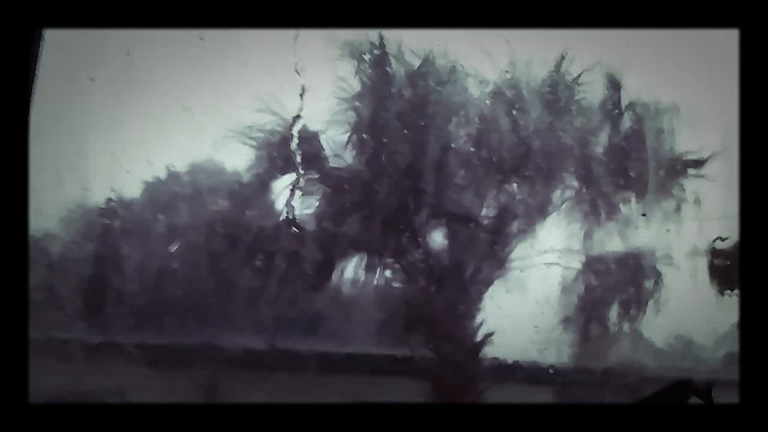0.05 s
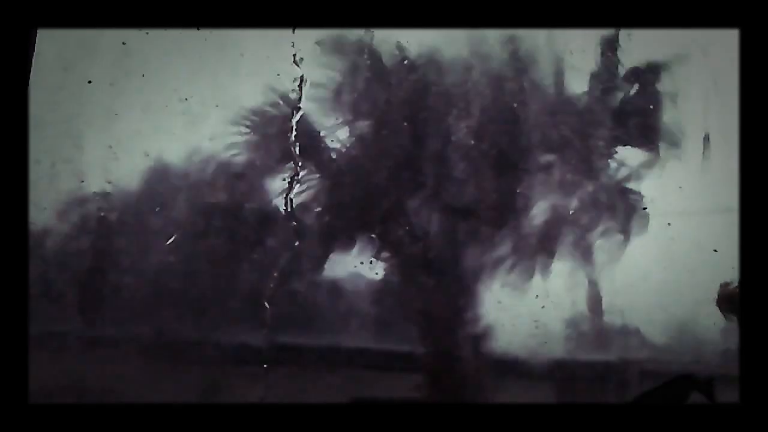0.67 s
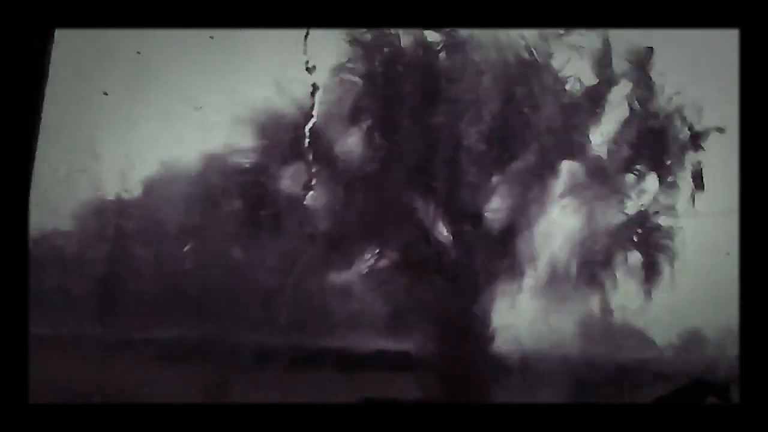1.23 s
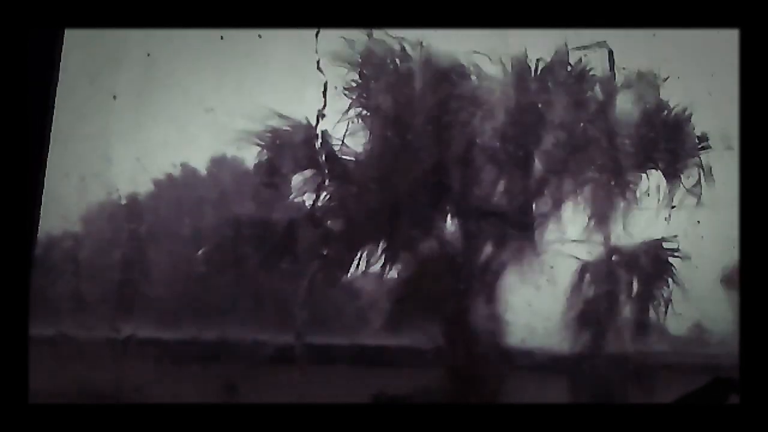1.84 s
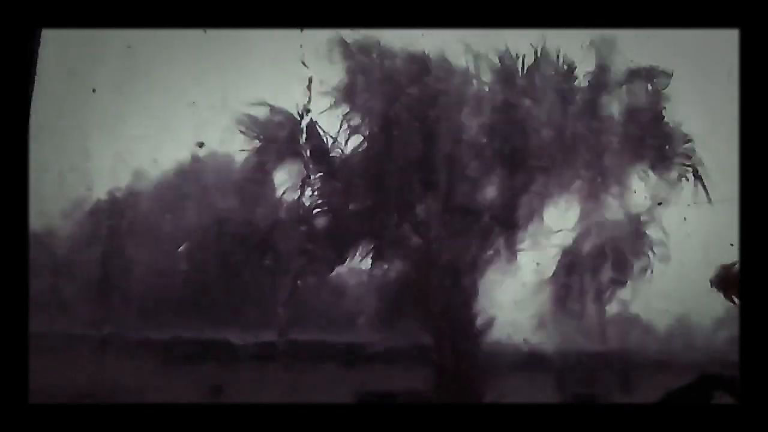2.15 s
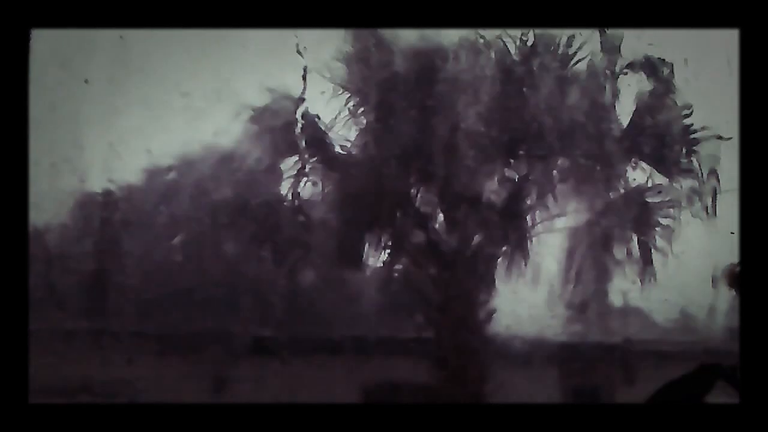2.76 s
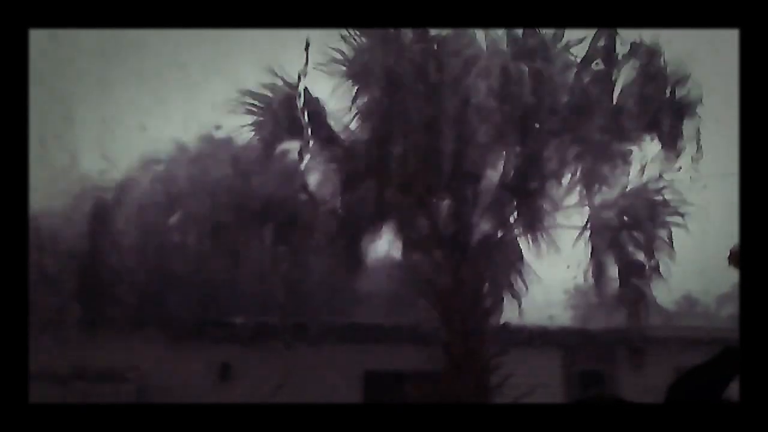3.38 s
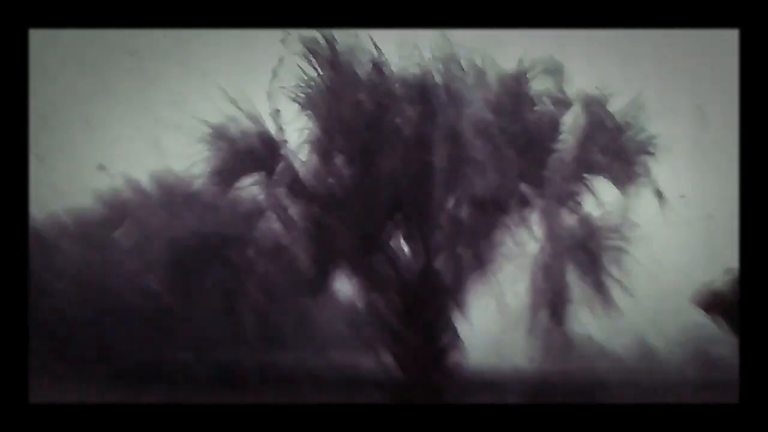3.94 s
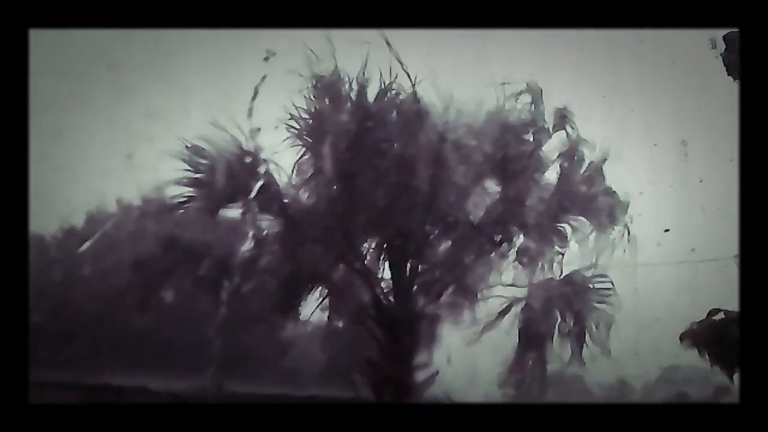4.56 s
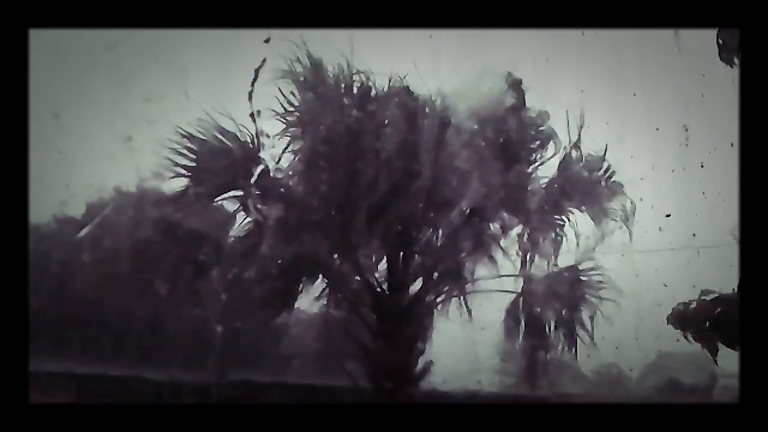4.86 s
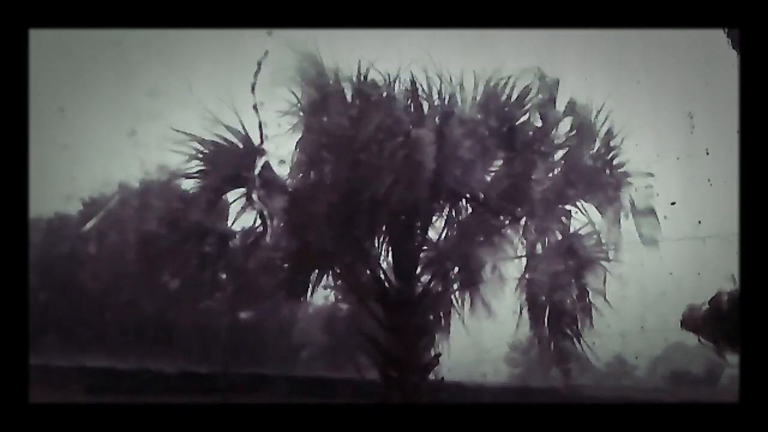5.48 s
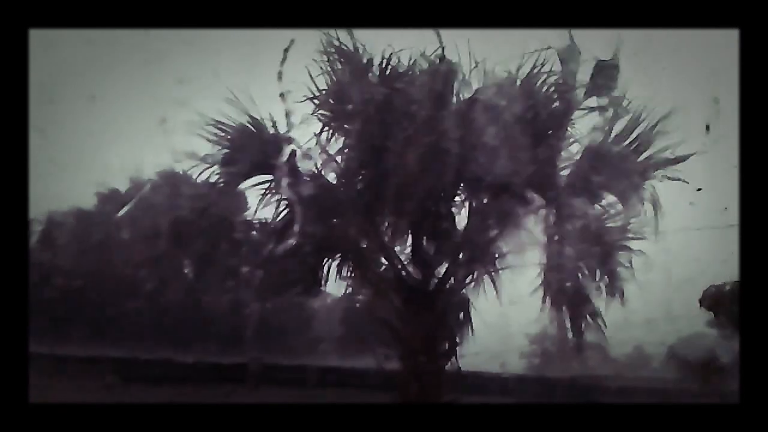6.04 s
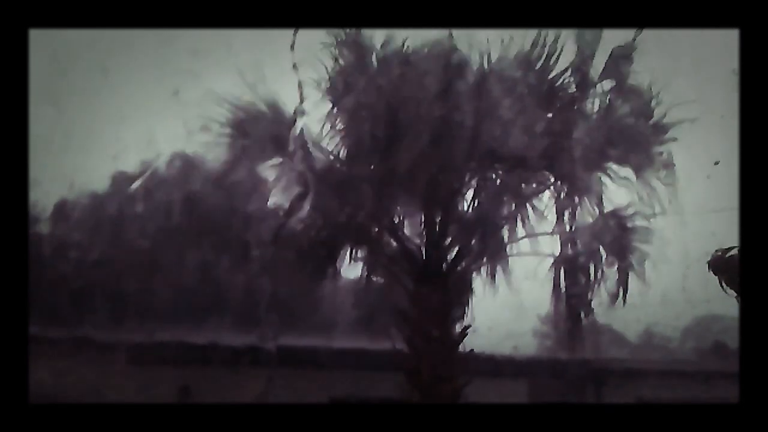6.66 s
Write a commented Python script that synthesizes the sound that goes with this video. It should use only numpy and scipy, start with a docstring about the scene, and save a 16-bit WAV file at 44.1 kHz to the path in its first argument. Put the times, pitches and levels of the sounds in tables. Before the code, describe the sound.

A rainstorm roars outside as spray patters on a window, gusts thud against the pane and something thumps the wall.

```python
"""A rainstorm heard from a room, behind a window. The sound starts abruptly: countless drop impacts
add up to a roar in the trees, spray patters on the glass and wind makes the pane rumble. Splashes
crackle; from about 2 s gusts drive the pane's resonances, and the strongest flings water at it.
Just after 4 s something knocks on the wall, debris rattles on the glass and a hard drop ticks; then the
rain eases. Two spaced microphones, one wired in opposite polarity, receive it all."""
import sys
import numpy as np
from scipy import signal
from scipy.fft import rfft, irfft, next_fast_len
from scipy.io import wavfile
from scipy.ndimage import uniform_filter1d, map_coordinates

SR = 44100
rng = np.random.default_rng(int(sys.argv[2]) if len(sys.argv) > 2 else 0)


def wav_out(sig):
    """Save sig, one row per channel (or a flat mono array), as 16-bit PCM at SR to the path in sys.argv[1]."""
    wavfile.write(sys.argv[1], SR, np.round(np.clip(np.atleast_2d(sig).T, -1, 1) * 32767).astype(np.int16))


N = 295911

# strength of the downpour: time_s, relative_level_db
DOWNPOUR = [(0.6, -52.5), (0.85, -52.5), (1.12, -53), (1.22, -54.5), (1.33, -52.5), (1.55, -54.5),
            (2.3, -53), (3.0, -55), (3.55, -56.5), (3.8, -53.5), (4.06, -52.5), (4.4, -55), (6.7, -55.5)]
TOP_HZ = 14300  # upper band limit


def amp(db):
    """Decibels to amplitude ratio."""
    return 10 ** (np.asarray(db) / 20)


def unit(x):
    """Normalisation to rms 1."""
    return x / np.sqrt(np.mean(x ** 2) + 1e-20)


def along(points, hz):
    """Interpolation of (frequency_hz, value) points on a logarithmic frequency axis."""
    knots_hz, values = np.transpose(points)
    return np.interp(np.log(hz + 1), np.log(knots_hz + 1), values)


def over_time(points):
    """Linear interpolation of (time_s, value) points at every sample."""
    return np.interp(np.arange(N) / SR, *np.transpose(points))


def wobble(rate):
    """Slow random modulation: a spline through rate knots a second."""
    return map_coordinates(rng.standard_normal(int(N * rate / SR) + 4), [np.arange(N) * rate / SR])


def filtered(x, response):
    """Linear filtering: the spectrum of x times a frequency response."""
    n = x.shape[-1]
    padded = next_fast_len(n + 8192)
    return irfft(rfft(x, padded) * response(np.fft.rfftfreq(padded, 1 / SR)), padded)[..., :n]


def patchy_noise(patchy_db):
    """Two independent noises, modulated by the same random patches in time and frequency."""
    spectra = signal.stft(rng.standard_normal((2, N)), nperseg=512)[2]
    patches = uniform_filter1d(rng.standard_normal(spectra.shape[1:]), size=7, axis=0)
    patches = uniform_filter1d(patches, size=12, axis=1)
    return signal.istft(spectra * amp(patchy_db * unit(patches)), nperseg=512)[1][:, :N]


def diffuse(pair, spectrum, spacing_m=0.15, sound_speed_m_s=343):
    """Diffuse-field coherence: long waves reach both microphones alike, short ones do not."""
    def response(hz):
        turn = np.arccos(np.sinc(2 * hz * spacing_m / sound_speed_m_s)) / 2
        return amp(along(spectrum, hz)) * [np.cos(turn), np.sin(turn)]
    common, apart = filtered(pair, response)
    return unit(np.array([common + apart, common - apart]))


def from_side(x, lead_s):
    """Path difference: the sound reaches the right microphone lead_s before the left."""
    return filtered(x, lambda hz: np.exp(1j * np.pi * hz * lead_s * np.array([[-1], [1]])))


def surge(t, hold_s, attack_s, release_s):
    """An envelope with a linear rise and, after hold_s, an exponential decay."""
    return np.clip(t / attack_s, 0, 1) * np.exp(-np.maximum(t - hold_s, 0) / release_s)


def surges(rows, attack_s, release_s):
    """Incoherent addition: the summed power of (start_s, level_db, hold_s) events."""
    t = np.arange(N) / SR
    return sum((amp(db) * surge(t - s, hold, attack_s, release_s)) ** 2 for s, db, hold in rows)


def roar():
    """Superposition: countless drops on leaves, roof and ground merge into a wash of noise."""
    # spectrum of the rain: frequency_hz, density_db
    rain_spectrum = [(30, -18), (90, 4.5), (200, 8.5), (295, 7), (370, 2.5), (450, 3), (560, 1.3),
                     (760, 1.3), (950, 0.5), (1300, -2.5), (1750, -2.5), (2300, -4), (2800, -4.5),
                     (3300, -6.5), (4000, -8), (6500, -14.5), (14000, -19)]
    wash = diffuse(patchy_noise(patchy_db=1.4), rain_spectrum)
    direct = filtered(rng.standard_normal(N), lambda hz: amp(along(rain_spectrum, hz)))
    direct = unit(from_side(direct, lead_s=0.00029))
    level_db = over_time(DOWNPOUR) + 6.5 + 0.24 * wobble(15)
    return amp(level_db) * unit(wash + amp(-6.5) * direct)


def drops(rate, spread_db):
    """Shot noise: impulses at random times and directions, most small, a few large."""
    when, strength, direction = rng.random((int(rate * N / SR), 3)).T
    at = (when * (N - 1)).astype(int)
    size = amp(spread_db * np.minimum(-np.log(1 - strength), 3.6))
    turn = direction * np.pi / 2
    return unit(np.array([np.bincount(at, size * side, N) for side in (np.cos(turn), np.sin(turn))]))


def spray(splat_t60_s=0.042):
    """Impact noise: fine spray hisses on the glass, bigger drops splat, and sheets of rain swell both."""
    # sheets of rain sweeping the glass: start_s, level_db, hold_s
    sheets = [(.67, -52.5, 0.17), (3.755, -49, 0.09), (4.12, -50, 0.025)]
    # spectrum of the spray: frequency_hz, density_db
    spray_spectrum = [(800, 0), (2500, -11), (4500, -3.5), (7000, -4), (9500, -2), (12000, -1.5),
                      (14300, -10)]
    rain_db = over_time(DOWNPOUR)
    steady_db = -54 + 0.82 * (rain_db - rain_db.mean())
    level_db = 10 * np.log10(amp(steady_db) ** 2 + surges(sheets, attack_s=0.0088, release_s=0.12))
    hiss = diffuse(patchy_noise(patchy_db=2.1), spray_spectrum)
    t = np.arange(SR // 50) / SR
    decay = amp(-60 * t / splat_t60_s)[None]
    splat_power = signal.fftconvolve(drops(rate=360, spread_db=16) ** 2, decay ** 2, axes=1)[:, :N]
    patter = diffuse(np.sqrt(np.abs(splat_power)) * rng.standard_normal((2, N)), spray_spectrum)
    return amp(level_db + 0.27 * wobble(8.7)) * (amp(-2) * hiss + amp(-10.5) * patter)


def wind_pressure(steady_db=-47.5, eddy_db=0.5, eddy_decay_s=0.27):
    """Turbulence: steady wind, gusts and the dying eddies they leave add in power to a level in dB."""
    # gusts pressing on the pane: start_s, level_db, hold_s
    gusts = [(1.9, -39, 0.066), (2.07, -42.5, 0.14), (2.35, -40, 0.079), (3.22, -43.5, 0.12),
             (3.615, -37.5, 0.16), (3.875, -53, 0.026), (4.28, -38.5, 0.082), (4.49, -42.5, 0.05),
             (5.04, -43.5, 0.17), (5.53, -49, 0.06)]
    gust_power = surges(gusts, attack_s=0.014, release_s=0.032)
    fade = np.exp(-1 / (eddy_decay_s * SR))
    eddy_power = amp(eddy_db) ** 2 * signal.lfilter([1 - fade], [1, -fade], gust_power)
    return 10 * np.log10(amp(steady_db) ** 2 + gust_power + eddy_power)


def resonances(modes):
    """Modal superposition: the response of damped resonators of alternating sign."""
    return lambda f: sum((-1) ** k * amp(db) * 1j * f * width / (pitch ** 2 - f ** 2 + 1j * f * width)
                         for k, (pitch, width, db) in enumerate(modes))


def evened(pane):
    """Division by the running rms steadies the pane's swing, so that it follows the pressure closely."""
    return pane / np.sqrt(np.abs(uniform_filter1d(pane[0] ** 2, size=2600)) + 0.031)


def wind():
    """Forced vibration: wind makes the pane rumble; the harder it blows, the more the modes drum."""
    # spectrum of the rumbling pane: frequency_hz, density_db
    rumble_spectrum = [(15, -30), (30, -17), (48, -2), (75, -0.5), (102, 3), (135, 0.5), (178, -3),
                       (225, -7), (320, -19), (600, -32), (1500, -55)]
    # spectrum of the force on its modes: frequency_hz, density_db
    drive_spectrum = [(30, -19), (80, -8), (300, -8), (900, -33)]
    # modes of the pane: pitch_hz, bandwidth_hz, level_db
    pane_modes = [(105, 28, -6.5), (124, 13, -10.5), (155, 15, 0), (180.3, 18.5, 1.5), (224, 9, -6.5),
                  (285.5, 12, -14.5)]
    level_db = wind_pressure()
    rumble = diffuse(rng.standard_normal((2, N)), rumble_spectrum)
    drive = diffuse(rng.standard_normal((2, N)), drive_spectrum)
    drumming = unit(filtered(drive, resonances(pane_modes)))
    drumming = from_side(drumming, lead_s=-0.00012)  # a little to the left
    modal_share = 0.57 / (1 + np.exp(-(level_db + 40) / 3))
    pane = np.sqrt(1 - modal_share) * rumble + np.sqrt(modal_share) * drumming
    return amp(level_db) * evened(pane) * amp([[0.5], [-0.5]])


def burst(centre_hz, width_octaves, length_s, attack_s=0.00072):
    """A band-limited transient: uneven fizz with separate impulses crackling in it."""
    def colour(hz):
        return np.exp(-0.5 * (np.log2((hz + 1) / centre_hz) / width_octaves) ** 2) * (hz < TOP_HZ)
    t = np.arange(SR // 3) / SR
    uneven = amp(unit(uniform_filter1d(rng.standard_normal(len(t)), size=90)))
    fizz = filtered(uneven * rng.standard_normal((2, len(t))), colour)
    crackle = filtered(drops(rate=420, spread_db=5)[:, :len(t)], lambda hz: np.sqrt(colour(hz)))
    envelope = (1 - np.exp(-t / attack_s)) * np.exp(-(t / length_s) ** 2)
    return envelope * unit(fizz + amp(-11) * crackle)


def splashes():
    """Liquid impact: flung water strikes the glass in bursts of droplets, each in its own band."""
    # water hitting the glass: start_s, level_db, centre_hz, width_octaves, length_s
    impacts = [(0.773, -49, 9000, 1, 0.02), (1.159, -50, 10000, 0.37, 0.0064),
               (1.354, -55, 5000, 0.94, 0.039), (1.672, -47, 8000, 0.97, 0.0036),
               (2.734, -54, 10000, .6, 0.014), (3.76, -44, 12000, .3, .002), (3.768, -47, 12000, 0.5, .008),
               (3.779, -46, 12000, .4, .004), (3.78, -46.5, 8500, .7, 0.006),
               (3.834, -44, 12000, 0.35, 0.005), (3.845, -50, 10500, .6, 0.011),
               (3.8995, -45, 9500, .6, 0.005), (4.04, -47, 2010, 1, 0.026), (4.54, -52, 9000, .75, 0.013),
               (4.987, -50.5, 9200, 0.46, 0.01)]
    out = np.zeros((2, N + SR))
    for start_s, db, centre_hz, width_octaves, length_s in impacts:
        splash = amp(db) * burst(centre_hz, width_octaves, length_s)
        out[:, round(start_s * SR):][:, :splash.shape[1]] += splash
    return out[:, :N]


def buffets():
    """Plate flexure: sudden shoves of air bend the whole pane with a deep thud, each at its own pitch."""
    # shoves of air: start_s, level_db, hold_s, pitch_ratio
    shoves = [(1.945, -44, 0.03, .7), (2.111, -42, 0.026, 0.74), (2.197, -45, 0.045, 0.72),
              (2.387, -44, 0.04, .7), (3.31, -50, .04, 0.69), (3.651, -33.5, 0.1, 0.95),
              (3.883, -39.5, .045, 1), (4.29, -35.5, 0.064, 1.05), (4.502, -39, .03, 0.71),
              (5.139, -41, 0.034, 1.17), (5.25, -42, 0.032, 1), (5.383, -39, 0.02, 0.85),
              (5.554, -43, .025, .9), (5.79, -45, .025, 0.96), (6.232, -40, 0.036, 1.12)]
    # spectrum of the flexing pane at pitch ratio 1: frequency_hz, density_db
    flex_spectrum = [(18, -24), (35, -17), (60, -2), (95, 6), (140, -25), (300, -36), (900, -70)]
    out, t = np.zeros((2, N + SR)), np.arange(SR // 3) / SR
    for start_s, db, hold_s, pitch_ratio in shoves:
        shifted = np.array(flex_spectrum) * [pitch_ratio, 1]
        swing = evened(diffuse(rng.standard_normal((2, len(t))), shifted))
        push = amp(db) * surge(t, hold_s, attack_s=0.012, release_s=0.018)
        out[:, round(start_s * SR):][:, :len(t)] += push * swing
    return out[:, :N] * amp([[0.5], [-0.5]])


def knock():
    """Impact excitation: a blunt object thumps the wall and bounces, ringing its damped modes."""
    # the blow and its bounces: start_s, level_db
    blows = [(4.0405, -24.5), (4.0473, -35), (4.0622, -58), (4.0897, -45)]
    # modes of the wall: pitch_hz, level_db, t60_s
    wall_modes = [(136.2, -13, 0.064), (192, 2.5, 0.071), (273, 2.5, 0.061), (324, -2, 0.069),
                  (440, 2.5, 0.036), (495, 0.5, 0.039), (630, -13, 0.031), (850, -12, 0.07)]
    thump, t = np.zeros(N + SR), np.arange(SR // 2) / SR
    ring = sum(amp(db - 60 * t / t60) * np.sin(2 * np.pi * hz * t) for hz, db, t60 in wall_modes)
    for start_s, db in blows:
        thump[round(start_s * SR):][:len(t)] -= amp(db) * ring * (1 - np.exp(-t / 0.00022))
    # the contact is soft, and the wall radiates little deep bass
    thump = signal.sosfilt(signal.butter(2, [95, 920], "bandpass", fs=SR, output="sos"), thump)[:N]
    direct = np.array([np.roll(thump, 4), thump])  # reaches the right microphone first
    return (direct + amp(-11.5) * ring_out(thump, t60_s=0.24)) * amp([[0.7], [-0.7]])


def ring_out(x, t60_s):
    """Reverberation: the room's dying tail of reflections, partly alike at the two microphones."""
    t = np.arange(SR // 2) / SR
    tail = rng.standard_normal((2, len(t))) * amp(-60 * t / t60_s)
    common, apart = signal.fftconvolve(x[None], tail / np.linalg.norm(tail[0]), axes=1)[:, :N]
    return np.array([common + 0.31 * apart, common - 0.29 * apart])


def clicks(hits, modes, attack_s, dispersion_s=0, scatter_db=0.8, detune=0.02):
    """Free vibration: each hard contact rings the modes at a slightly different strength and pitch."""
    out = np.zeros((2, N + SR))
    hz, mode_db, t60 = np.transpose(modes)[:, :, None]
    delay_s = dispersion_s * (np.sqrt(hz.max() / hz) - 1)
    t = np.maximum(np.arange(SR // 20) / SR - delay_s, 0)
    for start_s, db in hits:
        louder, higher, phase = rng.standard_normal((3, 2, len(modes), 1))
        envelope = amp(db + mode_db + scatter_db * louder - 60 * t / t60) * (1 - np.exp(-t / attack_s))
        ring = envelope * np.sin(2 * np.pi * (hz * (1 + detune * higher) * t + phase))
        out[:, round(start_s * SR):][:, :t.shape[1]] += ring.sum(axis=1)
    return out[:, :N]


def debris():
    """Impact and friction: light debris grazes the window, a brief, hard rattle over a dry scrape."""
    # contacts of the rattle: start_s, level_db
    taps = [(4.1502, -32.5), (4.1520, -35.5), (4.1530, -38), (4.1545, -33.5), (4.1558, -42),
            (4.1578, -35.5)]
    # modes the debris rings with: pitch_hz, level_db, t60_s
    tap_modes = [(2860, -14, 0.0068), (3480, 2.5, 0.007), (4600, -5.5, 0.006), (5900, -0.5, 0.0046),
                 (7650, -0.5, 0.007)]
    scrape = amp(-40.5) * burst(centre_hz=4000, width_octaves=0.68, length_s=0.01)
    out = clicks(taps, tap_modes, attack_s=0.00024)
    out[:, round(taps[0][0] * SR):][:, :scrape.shape[1]] += scrape
    return out


def hard_drop():
    """Dispersion: a drop ticks on the glass, whose slower, lower waves arrive later in a falling chirp."""
    # the drop and its rebound: start_s, level_db
    ticks = [(4.3102, -30.5), (4.3127, -36)]
    # bright, short-lived modes of the tick: pitch_hz, level_db, t60_s
    tick_modes = [(8400, 3, 0.0081), (9900, -1, 0.0076), (11500, -4, 0.0041), (12400, -5, .004),
                  (14000, -3, .005)]
    return clicks(ticks, tick_modes, attack_s=0.00027, dispersion_s=0.00265)


def scene():
    """Superposition: the pressures of all sources add at the two microphones."""
    return roar() + spray() + wind() + splashes() + buffets() + knock() + debris() + hard_drop()


def record(dry):
    """Port resonance lifts the treble; the right channel is inverted; both are gated on and low-passed."""
    # port resonance of the left and right microphones: centre_hz, bandwidth_hz, gain_db
    ports = [(12080, 4320, 11.5), (9640, 2200, 4)]
    # further response of the right microphone: frequency_hz, gain_db
    right_tilt = [(200, -0.11), (900, -0.4), (1500, -0.1), (2500, 1.3), (4000, 2.5), (7500, 3.5),
                  (11000, 0.0), (14000, -0.5)]

    def port_response(hz):
        return np.array([amp(db / (1 + (2 * (hz - centre) / width) ** 2)) for centre, width, db in ports])
    left, right = filtered(dry, port_response)
    right = -filtered(right, lambda hz: amp(along(right_tilt, hz)))
    running = np.arange(N) / SR >= 0.583  # silence before this time, in s
    return filtered(np.array([left, right]) * running, lambda hz: 1 / np.sqrt(1 + (hz / TOP_HZ) ** 600))


dry = scene()
out = record(dry)
wav_out(out)
```